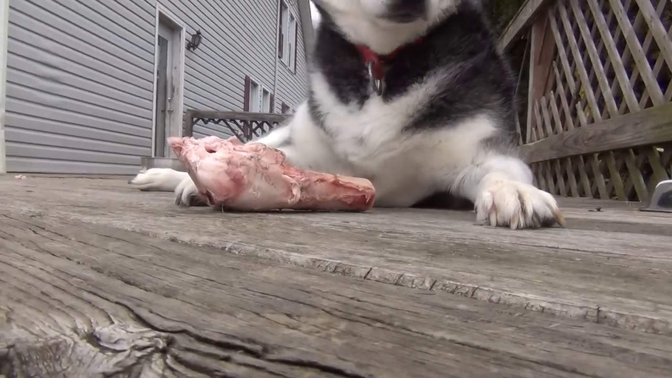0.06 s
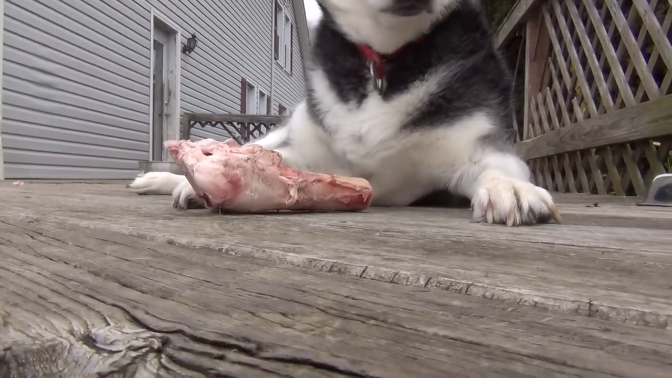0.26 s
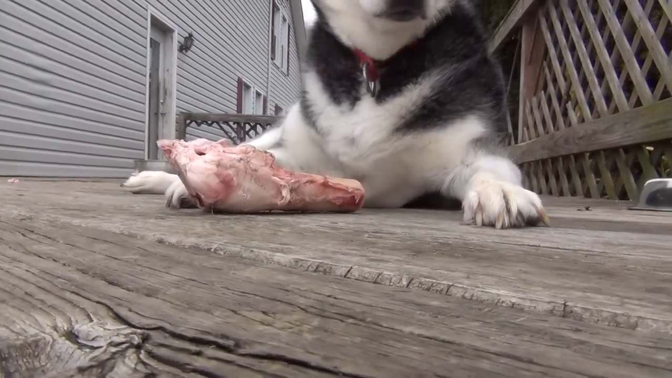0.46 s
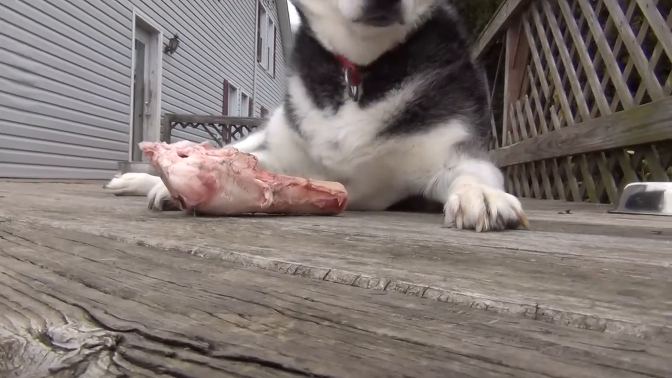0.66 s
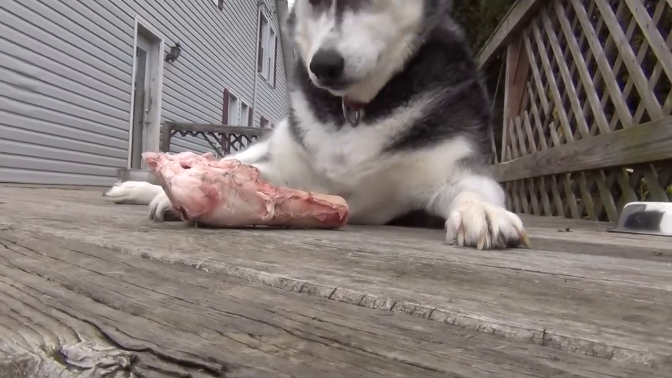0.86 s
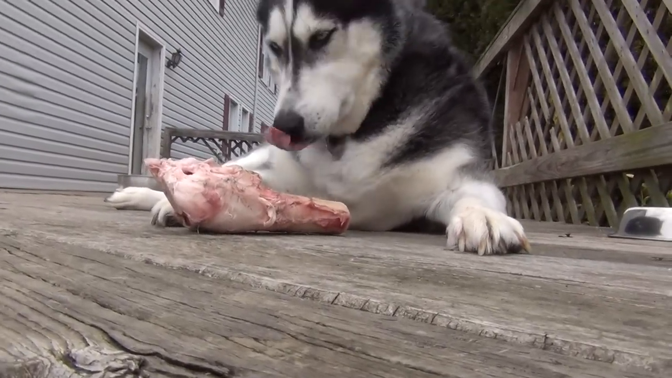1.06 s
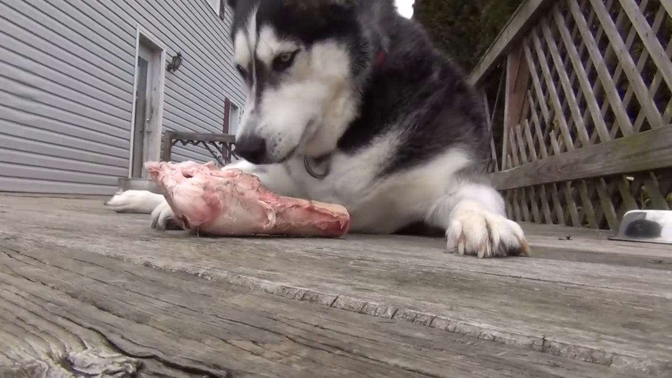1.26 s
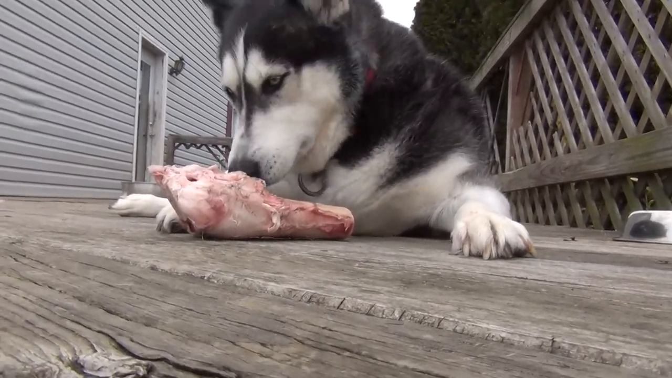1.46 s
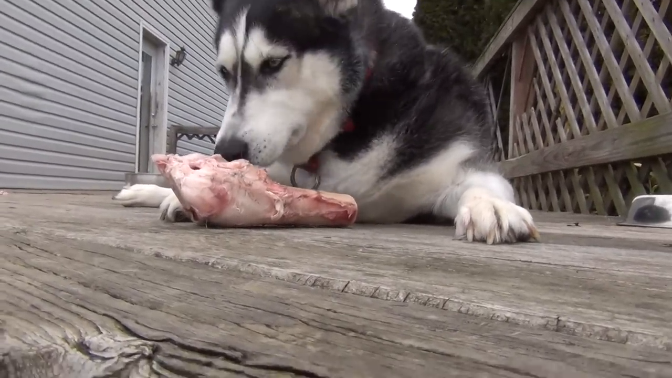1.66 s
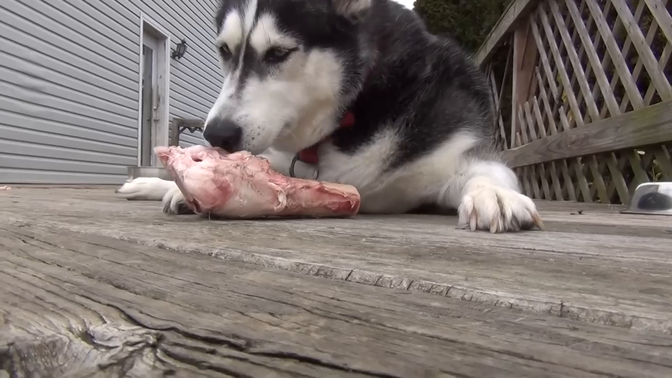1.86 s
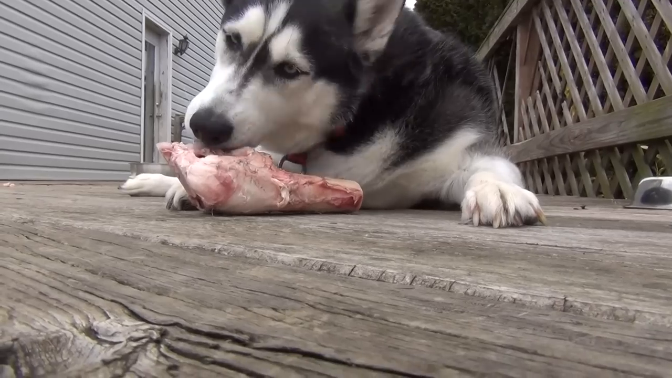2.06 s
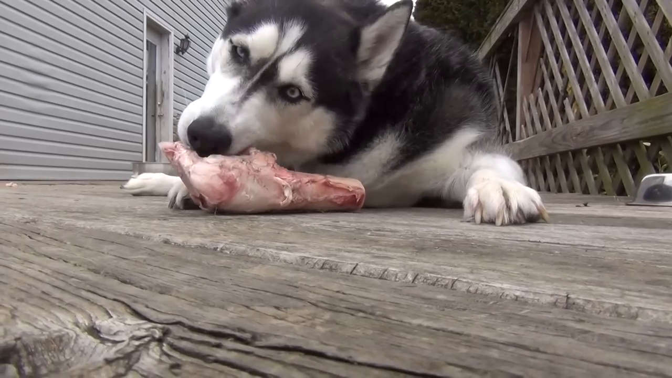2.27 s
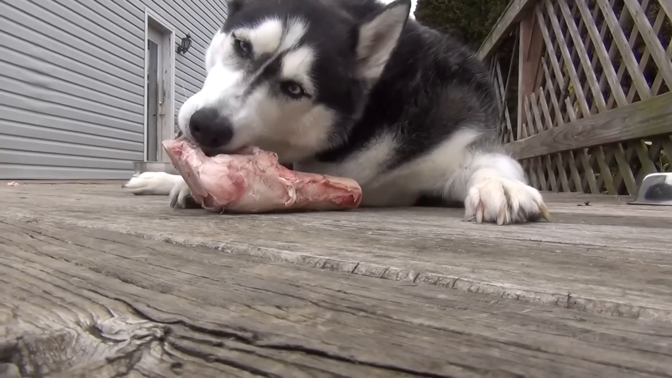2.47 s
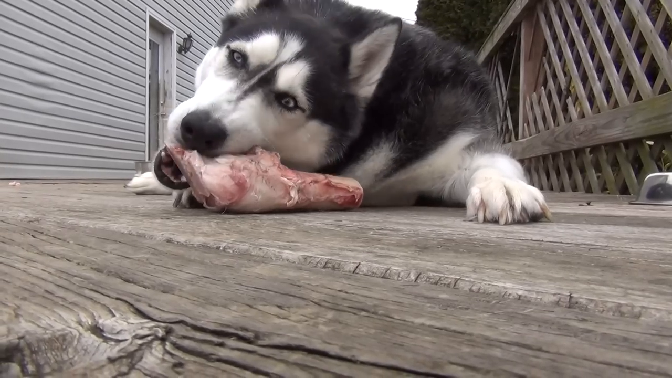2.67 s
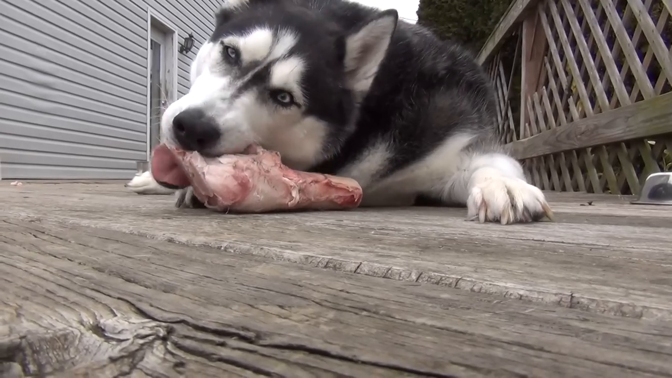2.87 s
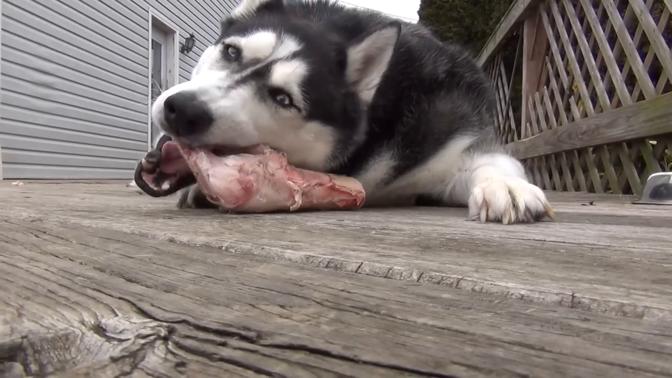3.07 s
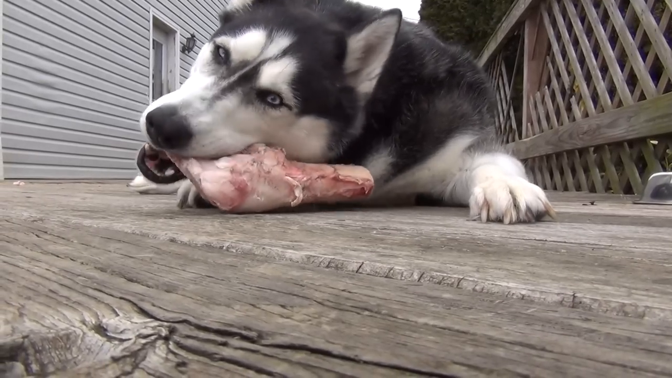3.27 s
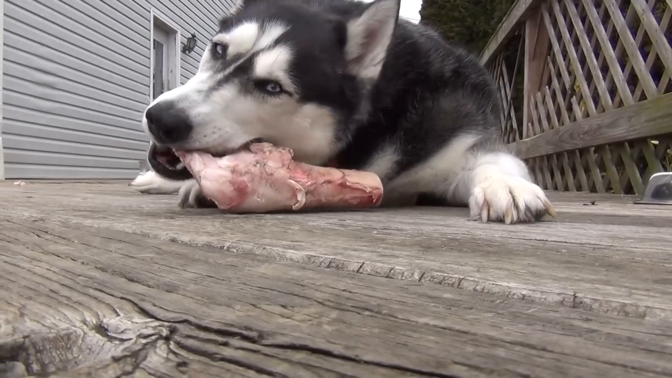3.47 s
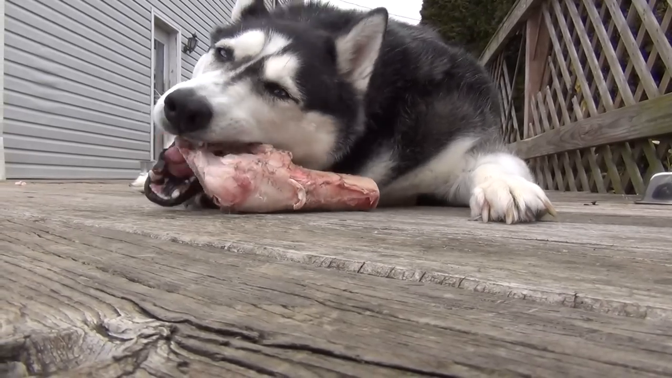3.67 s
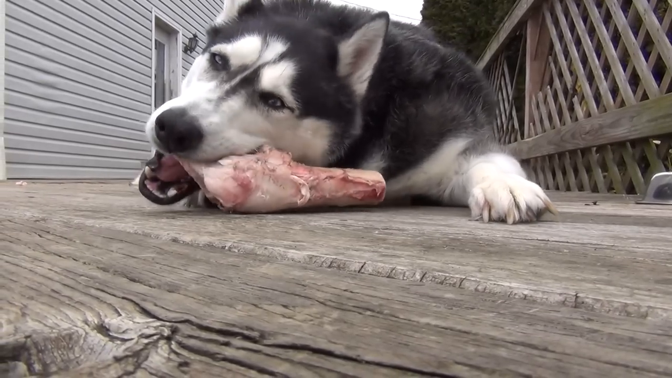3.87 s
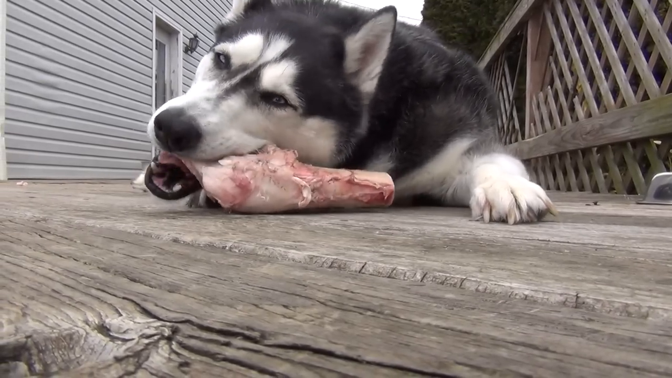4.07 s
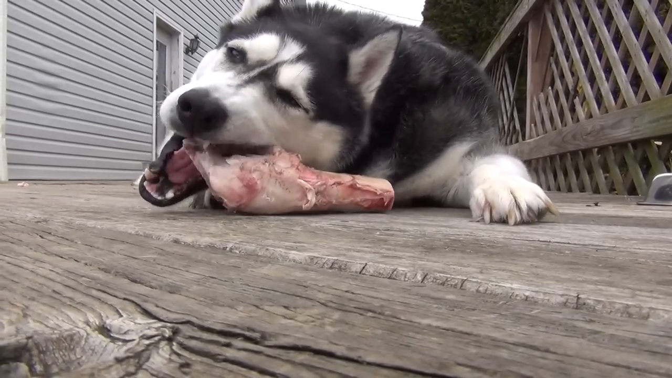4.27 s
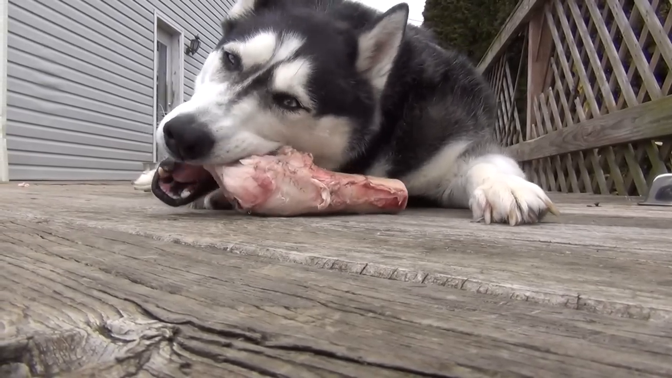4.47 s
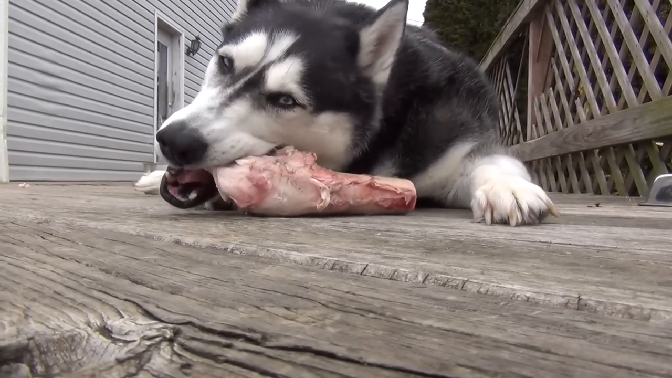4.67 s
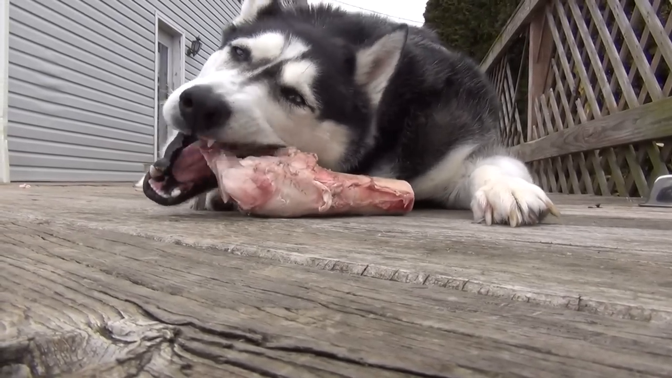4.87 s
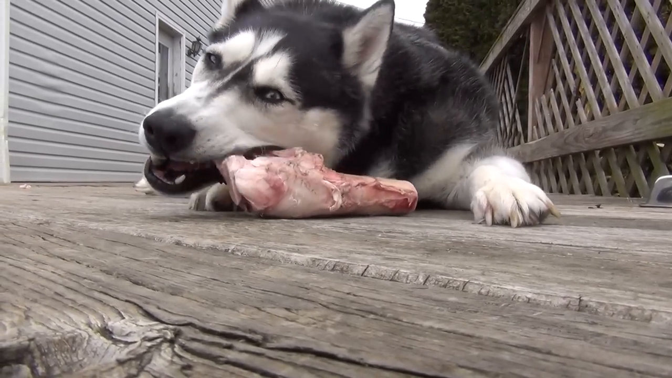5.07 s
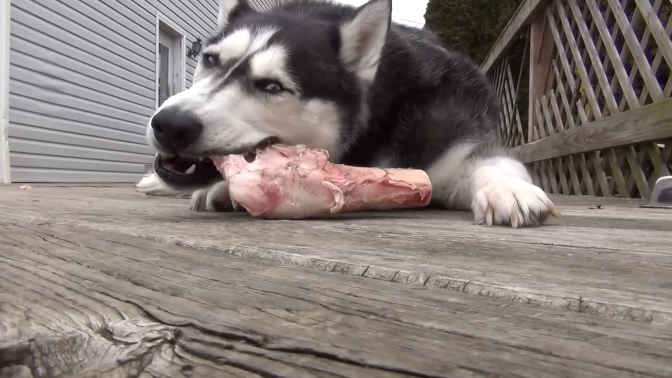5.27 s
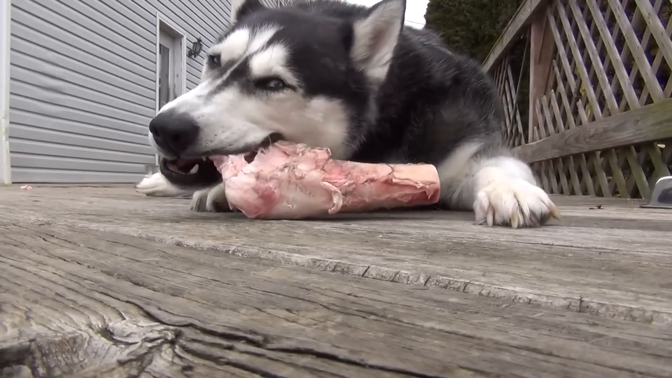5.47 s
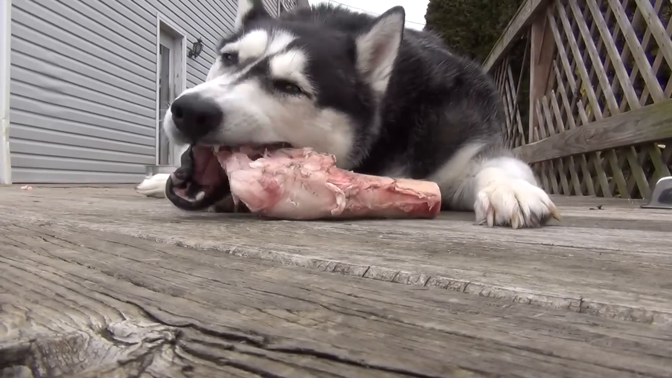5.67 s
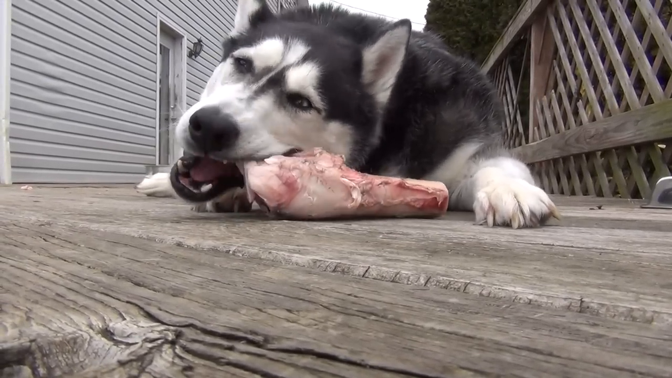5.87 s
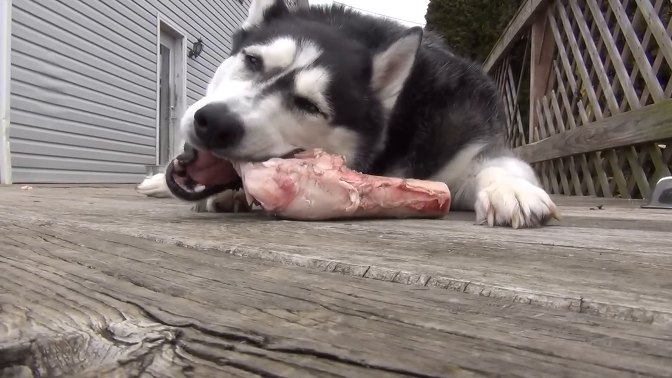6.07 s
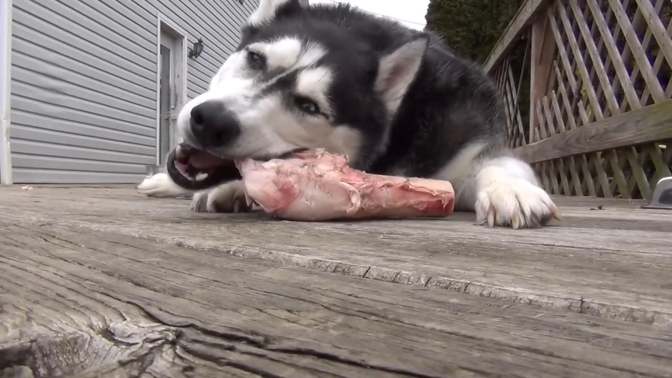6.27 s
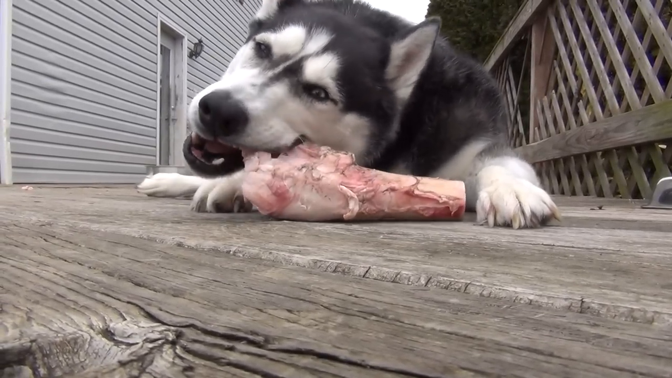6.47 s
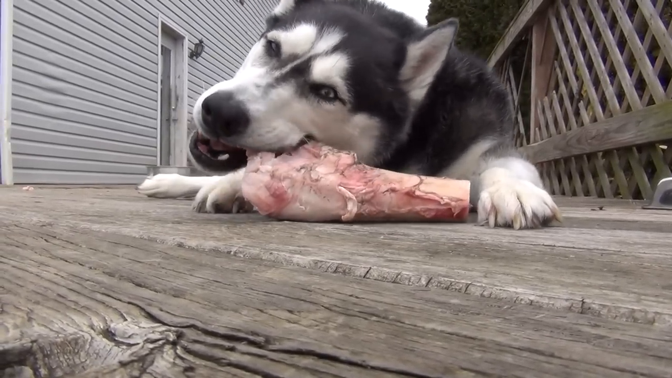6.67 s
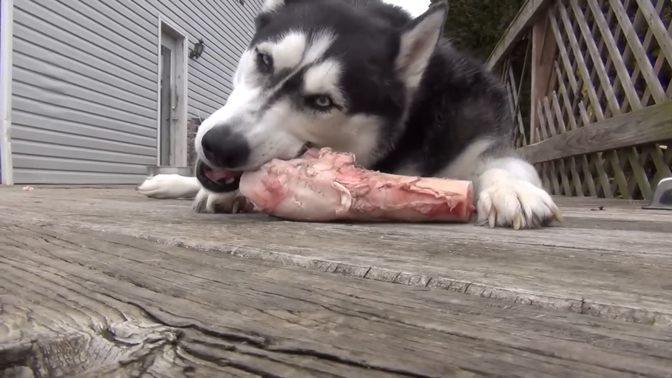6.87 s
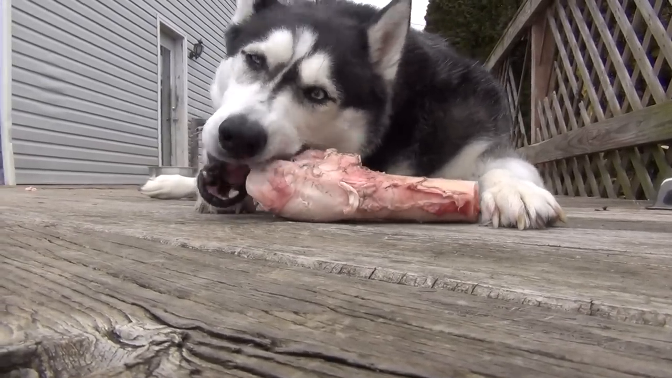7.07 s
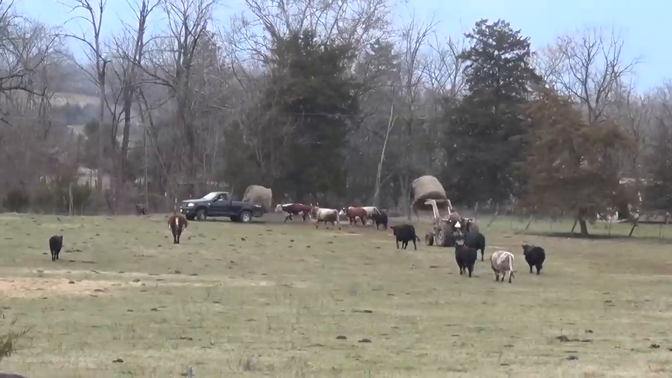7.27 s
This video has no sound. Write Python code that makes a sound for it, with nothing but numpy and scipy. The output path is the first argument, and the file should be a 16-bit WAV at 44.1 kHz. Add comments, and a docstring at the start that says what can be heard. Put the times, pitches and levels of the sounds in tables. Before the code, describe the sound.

A dog gnaws a big raw bone on a wooden deck, teeth cracking in irregular bursts, bone knocking hollowly on the planks, gristle tearing.

```python
"""A dog on a wooden deck gnaws a big raw bone close to a camera lying on the boards.
First claws and teeth crack, fur and tongue rub; from 1 s the bone knocks on the planks, ringing their modes.
A tooth creaks on the bone at 4.0 and 4.6 s by stick-slip, and at 5.2 s gristle tears off in quick slips.
Bright wet ticks are sprinkled in; a shaped-noise rumble and hush with faint crackle lie beneath throughout.
Near 7.17 s the rubbing stops, rumble and hush step up, and the crackle sinks away."""
import sys
import numpy as np
from scipy import signal
from scipy.fft import rfft, irfft
from scipy.io import wavfile
from scipy.ndimage import uniform_filter1d

SR = 44100
rng = np.random.default_rng(int(sys.argv[2]) if len(sys.argv) > 2 else 0)


def log_audio(samples):
    """Write samples as a 16-bit WAV file to the path given in sys.argv[1]."""
    # one column per channel
    frames = np.atleast_2d(samples).T
    # limit to full scale, then quantise
    limited = np.clip(frames, -1, 1)
    pcm = np.round(limited * 32767).astype(np.int16)
    wavfile.write(sys.argv[1], SR, pcm)


N = 322808

# bone dropping on the planks: t/s, peak level/dB, f/Hz around which the struck spot rings best
KNOCKS = [(1.035, -16, 290), (1.247, -13.5, 290), (1.536, -27, 336), (2.353, -12, 108), (2.401, -12, 830),
          (2.451, -4.5, 352), (2.656, -6.5, 720), (2.766, -30, 736), (2.874, -13.5, 270),
          (2.94, -19.5, 528), (3.182, -14, 298), (3.299, -22, 700), (3.433, -10, 560), (3.5, -17.5, 670),
          (3.596, -1.5, 380), (3.863, -14.5, 206), (4.152, -16.5, 910), (4.191, 3.5, 422),
          (4.398, -17.5, 336), (4.963, -18.5, 450), (5.021, -13, 110), (5.456, -17, 524), (5.639, 3, 466),
          (5.897, -9.5, 475), (6.069, -11, 280), (6.248, -1.5, 272), (6.512, -18.5, 148),
          (6.605, -4.5, 236), (6.622, -6, 306), (6.645, -5.5, 282)]
# ringing modes of the planks: f/Hz, level/dB, t60/s
PLANK_MODES = [(116.5, -5, 0.32), (175, -4, 0.24), (267.4, -3, 0.15), (308.4, -1, 0.13), (380, -5.5, 0.078),
               (528.2, 1, 0.09), (724.5, -5, 0.069), (1030, 3, 0.051), (1560, -8, 0.019)]
# lean of the knocks to the left: t/s, left-right level/dB
KNOCK_LEAN = [(5.4, 4), (6.5, 10.5)]

# teeth and claws cracking on something hard: t/s, peak level/dB, peak level of the bright edge/dB
CRACKS = [(0.026, -3.5, -18), (0.048, -17, -16), (0.063, -14, -29), (0.097, -16, -32),
          (0.111, -13.5, -17.5), (0.143, -17, -9.5), (0.188, -8, -13), (0.209, -13, -14), (0.226, -12, -19),
          (0.245, -14.5, -26), (0.266, -17, -21), (0.288, -9.5, -35), (0.383, -9, -13), (0.448, -13.5, -15),
          (0.495, -21, -5.5), (0.653, -12, -37), (0.749, -20.5, -23.5), (0.889, -11, -13),
          (0.921, -17, -26), (0.945, -15, -16), (0.966, -16.5, -28), (0.991, -11.5, -12), (1.011, -22, -28),
          (1.03, -10.5, -10), (1.066, -13.5, -16), (1.076, -15.5, -10), (1.116, -5.5, -15),
          (1.135, -11.5, -31), (1.153, -10, -17), (1.175, -20, -15.5), (1.202, -9.5, -15),
          (1.246, -4.5, -4.5), (1.276, -8, 0.5), (1.308, -14.5, -15), (1.332, -18, -22), (1.905, -7, -17),
          (1.936, -26, -8.5), (2.15, -43, -6.5), (2.198, -20, -15), (2.224, -19, -11), (2.258, -16, -16),
          (2.272, -13, -4), (2.294, -16, -14), (2.352, -9, -12), (2.743, -12, -38), (2.846, -52, -16.5),
          (3.276, -33, -15.5), (3.413, -15, -18), (3.432, -0.5, -32), (3.957, -13, -4.5),
          (4.633, -12.5, -6), (4.652, -10, -30), (5.115, -8, -13), (5.134, -10.5, -4.5), (5.146, -11, -22),
          (5.152, -6.5, -3), (5.165, -26, -3), (5.169, -3.5, -2), (5.355, -26, -0.5), (5.411, -15, -5),
          (5.446, -8.5, -1.5), (5.683, -26, -42), (5.894, -4, -27), (6.28, -14.5, -41), (6.361, -19, -45),
          (6.419, -27, -46), (6.509, -4, -19), (6.627, -14, -20), (6.666, -15, -35), (6.919, -34, -49),
          (6.991, -46, -25)]
# shared pitch of the cracks in one bout: start t/s, f/Hz
CRACK_SPOTS = [(0, 773), (.35, 2010), (1.02, 1270), (1.5, 2140), (2.3, 910), (3.42, 1390), (3.7, 725),
               (4.05, 1370), (4.4, 2930), (4.9, 1830), (5.3, 2320), (5.7, 1260), (6.2, 1480)]
SPOT_SPREAD = 0.05  # share by which a crack strays from the pitch of its spot
# early cracks land on the boards and bring a woody thud, set against the crack's level
CLAWS_UNTIL_S, THUD_DB, THUD_HZ = 1.4, -9.5, 333
# bright ticks of wet tissue and tooth tips: t/s, peak level/dB
TICKS = [(0.6026, -4.5), (1.268, -5), (1.296, -12), (1.55, -15.5), (2.047, -13.5), (2.211, -14),
         (3.096, -12), (3.1226, -18), (3.134, -10.5), (3.7458, -4), (3.8264, -9.5), (3.916, -15.5),
         (4.364, -15.5), (4.996, -6), (5.007, -8.5), (5.385, -16), (5.567, -15), (6.9362, -24)]
TICK_HZ = 7700  # centre, each tick strays a little

# strokes of fur, tongue and teeth: start t/s, length/s, hiss level/dB, extra fizz level/dB, hollow f/Hz
RUB_STROKES = [(0.01, 0.12, -41, 10, 894), (0.137, 0.44, -32, 7, 4000), (0.515, 0.16, -28, 11.5, 1114),
               (0.825, 0.6, -42.5, -9, 4180), (1.02, 0.056, -33, -5, 1320), (2.185, 0.075, -31.5, 5, 2020),
               (2.256, 0.12, -38, 21, 4170), (2.367, 0.087, -33.5, 10.5, 4080),
               (2.719, 0.058, -46.5, 21, 2920), (3.05, 0.23, -73.5, 34.5, 3500),
               (3.205, 0.37, -48.5, 14.5, 1640), (4.362, 0.066, -41, 9, 3460),
               (4.945, 0.11, -38.5, 0, 1600), (5.064, 0.035, -33.5, -13, 1640),
               (5.298, 0.39, -40, -27, 1430), (5.409, 0.021, -19, 6.5, 2540),
               (5.862, 0.043, -33.5, 6, 1490), (6.163, 0.49, -58.5, 23.5, 1460),
               (6.601, 0.071, -35.5, -12, 1500), (6.822, 0.091, -37, -31, 1010), (7, 0.098, -38, 5.5, 1500),
               (7.1, 0.13, -23, 4.5, 760)]
# spectrum of the rubbing hiss: f/Hz, relative level per Hz/dB
RUB_COLOUR = [(180, -8), (300, 0.5), (1550, -0.5), (4500, -5.5), (8100, -17.5), (14000, -26)]
SWELL_POWER, RUBBING_ENDS_S = 1.25, 7.171  # a stroke is a half sine to this power

# gristle tearing, one list a pull: t/s, level/dB, slip rate/Hz
TEAR_PULLS = [
    [(5.184, -17, 215), (5.21, -10.5, 170)],
    [(5.215, -15, 270), (5.252, -12.5, 285)],
    [(5.255, -12.5, 260), (5.277, -13.5, 452), (5.339, -13.5, 160)],
]
# resonances a tearing slip rings: f/Hz, width/Hz, level/dB
BONE_MODES = [(977, 92, 14.5), (1470, 410, 9.5), (1750, 210, 16), (2340, 550, 13), (3500, 850, 8.5),
              (4970, 1350, 6), (6690, 510, 14), (7800, 2100, 3.5)]
# narrow gaps in the tearing ring: f/Hz, width/Hz
BONE_DIPS = [(4350, 370), (5950, 200)]
# tooth creaking along the bone, one list a stroke: t/s, level/dB, slip rate/Hz
CREAK_STROKES = [
    [(3.982, -23.5, 250), (4.005, -23, 350), (4.029, -29, 200)],
    [(4.036, -30.5, 92), (4.063, -28, 112)],
    [(4.612, -28, 100), (4.645, -29.5, 105), (4.699, -32.5, 150)],
]
# resonances a creaking slip rings: f/Hz, width/Hz, level/dB
JAW_MODES = [(720, 120, 12), (1470, 390, 6.5), (1970, 160, 6), (2940, 750, 5.5), (3560, 500, 6),
             (7760, 1800, -1)]

# spectrum of the early echoes: f/Hz, level/dB
WALL_COLOUR = [(500, 0.5), (2000, -7)]
# low rumble, of the boards and, from 7.18 s, a stronger one: t/s, level/dB
RUMBLE = [(0, -42), (1.3, -36), (1.7, -40), (7.17, -39.5), (7.185, -31)]
# spectrum of the rumble: f/Hz, relative level per Hz/dB
RUMBLE_COLOUR = [(30, -37), (60, 0), (110, 4.5), (200, -4), (800, -32)]
# hush of the place and faint chewing: t/s, hush level/dB, crackle level/dB
HUSH = [(0, -34.5, -43), (1.5, -41.5, -50.5), (2.5, -42, -44), (7.17, -43, -54), (7.2, -38.5, -79)]
# spectrum of the hush: f/Hz, relative level per Hz/dB
YARD_COLOUR = [(88, -44), (150, 2), (948, -1), (1370, -5.5), (5990, -21), (14600, -20), (15500, -60)]
# left-right likeness of rumble and hush: f/Hz, correlation (0 to 1)
LIKENESS = [(100, 0.99), (1000, 0.97), (6000, 0.99), (14000, 1)]
# lean of everything but the knocks to the left: f/Hz, left-right level/dB
LEAN = [(60, 10), (600, 0.5), (8000, .5)]

# microphone response: f/Hz, level/dB
MICROPHONE = [(25, -21), (70, 1), (8500, 1.5), (11000, -4.5), (15000, -8.5)]
WHINE_HZ, WHINE_DB = 15734, -65  # thin tone of the camera's electronics, RMS level
EDGE_HZ, CEILING = 16000, 0.93  # top of the band; full scale that rounded peaks approach


def knocks():
    """Each blow, a short rattle of contacts, rings the plank modes near its pitch; neighbours beat with them."""
    out, t = np.zeros((2, N)), np.arange(SR // 4) / SR
    hz, mode_db, t60 = np.transpose(PLANK_MODES)[:, :, None]
    spots = rng.standard_normal((len(KNOCKS), 3, len(PLANK_MODES), 1))
    chatter = rng.standard_normal((len(KNOCKS), 40))
    rattle_t = t[:SR // 20:56]  # a possible contact every 56 samples
    for (s, db, pitch_hz), spot, jolt in zip(KNOCKS, spots, chatter):
        octaves = np.log2(hz / pitch_hz)
        favour_db = 4 * np.exp(-(octaves / 0.25) ** 2) - 4.0 * octaves ** 2
        level = gain_of(mode_db + favour_db + 1.5 * spot[0] - 60 * t / t60)
        turn = 2 * np.pi * hz * (1 + 0.015 * spot[1]) * t
        neighbour = 0.55 * np.sin(turn * (1 + 0.12 * spot[2]))
        onset = np.minimum(t / 0.0017, 1)
        modes = level * (np.sin(turn) + neighbour) * onset
        side_db = np.interp(s, *np.transpose(KNOCK_LEAN)) * np.minimum(300 / hz, 1)  # the bass leans most
        ring = [(gain_of(sign * side_db / 2) * modes).sum(0) for sign in (1, -1)]
        contacts = np.zeros((1, SR // 20))
        contacts[0, ::56] = 0.17 * jolt * np.exp(-(rattle_t / 0.018) ** 2)
        contacts[0, 0] = 1
        sound = signal.oaconvolve(ring, contacts, axes=1)
        add(out, s, gain_of(db) * sound / abs(sound.mean(0)).max())
    return signal.sosfilt(signal.butter(2, 90, "high", fs=SR, output="sos"), out)


def cracks():
    """A hard contact snaps at the pitch of its spot, with a bright edge; early ones also thud in the wood."""
    out, (since, spot_hz) = np.zeros(N), np.transpose(CRACK_SPOTS)
    for (s, db, edge_db), noise in zip(CRACKS, rng.standard_normal((len(CRACKS), 4, 2000))):
        hz = spot_hz[since <= s][-1] * (1 + SPOT_SPREAD * noise[2, 0])
        sound = snap(db, hz, 0.026, noise[0], sharpness=2.6, kick=4.5)
        if s < CLAWS_UNTIL_S:
            sound = sound + snap(db + THUD_DB, THUD_HZ, 0.032, noise[3], sharpness=0.95, kick=3.4)
        edge = snap(edge_db, 4120, 0.024, noise[1], sharpness=1.0, kick=4.35)
        add(out, s, sound + edge)
    return out


def ticks():
    """Wet tissue and tooth tips give tiny snaps with a high, narrower resonance."""
    out = np.zeros(N)
    for (s, db), noise in zip(TICKS, rng.standard_normal((len(TICKS), 1001))):
        hz = TICK_HZ * (1 + 0.024 * noise[0])
        add(out, s, snap(db, hz, 0.012, noise[1:], sharpness=4.7, kick=3.7))
    return out


def snap(db, hz, t60, noise, sharpness, kick):
    """A sharp kick and a dying burst of noise, through a broad resonance with steep flanks."""
    t = np.arange(len(noise)) / SR
    burst = noise * gain_of(-60 * t / t60) * np.minimum(t / 0.00038, 1)
    burst[20] += kick
    sound = resonate(resonate(burst, hz, hz / sharpness), hz, hz / 0.48)
    return gain_of(db) * sound / abs(sound).max()


def tearing():
    """Gristle tears off in fast stick-slip that rings the bone, with narrow gaps in the ring."""
    tear = sum(slipping(pull, BONE_MODES, uneven_db=1.52, kick=3.5, flank=5.1, sign=-0.97)
               for pull in TEAR_PULLS)
    for hz, width_hz in BONE_DIPS:
        tear = tear - resonate(tear, hz, width_hz)
    return tear


def creaks():
    """A tooth sticks and slips along the bone, more evenly than a tear."""
    return sum(slipping(stroke, JAW_MODES, uneven_db=0.3, kick=4.5, flank=1.9, sign=0.94)
               for stroke in CREAK_STROKES)


def slipping(rows, modes, uneven_db, kick, flank, sign):
    """Stick-slip: each slip, a kick and a brief puff, rings the modes; a negative sign fills their valleys."""
    a, b = round(rows[0][0] * SR), round(rows[-1][0] * SR)
    db, per_s = (c[a:b] for c in follow(rows))
    drift, size, air = rng.standard_normal((3, N))[:, a:b]
    pace = per_s * gain_of(uneven_db * evened(uniform_filter1d(drift, size=300)))
    # a slip falls wherever the running count passes a whole number
    slips = np.diff(np.floor(np.cumsum(pace) / SR + 0.81), prepend=0) * gain_of(uneven_db * size)
    puffs = signal.lfilter([1], [1, -0.97], slips) * air + kick * slips
    ring = 0
    for k, (hz, width_hz, mode_db) in enumerate(modes):
        mode = resonate(resonate(puffs, hz, width_hz), hz, flank * width_hz)
        ring = ring + sign ** k * gain_of(mode_db) * mode
    out = np.zeros(N)
    out[a:b] = gain_of(db) * evened(ring) * signal.windows.tukey(b - a, 0.05)
    return out


def rubbing():
    """Hiss roughened by grains swells once a stroke and rings in a small hollow; wet strokes fizz high up."""
    grit = 0.65 + 0.4 * evened(signal.lfilter([1], [1, -0.98], abs(grains(500, 2.5))))
    hiss = evened(coloured(grit * rng.standard_normal(N), lambda hz: read(RUB_COLOUR, hz)))
    fizz = 0.29 * evened(resonate(resonate(hiss, 8130, 2400), 7600, 5600))
    out, t = np.zeros(N), np.arange(N) / SR
    for start, length, db, wet_db, hollow_hz in RUB_STROKES:
        part = slice(round(start * SR), round((start + length) * SR))
        swell = abs(np.sin(np.pi * (t[part] - start) / length)) ** SWELL_POWER
        hollow = 30 / np.sqrt(hollow_hz) * evened(resonate(hiss[part], hollow_hz, hollow_hz / 12))
        out[part] += gain_of(db) * swell * (hiss[part] + hollow + gain_of(wet_db) * fizz[part])
    return out * (t < RUBBING_ENDS_S)


def crackle():
    """Faint random ticks of the wet meat, in three sizes, coming in clumps."""
    drift = uniform_filter1d(uniform_filter1d(rng.standard_normal(N), size=2500), size=2500)
    clumps = gain_of(7.5 * evened(drift))
    out = np.zeros(N)
    for hz, share in [(1800, 0.3), (3800, 0.29), (7800, 0.31)]:
        out += share * resonate(resonate(grains(40 * clumps, 4.5), hz, hz / 3), hz, hz / 2.5)
    return evened(out)


def walls(x):
    """Dense early echoes from house wall and railing, different on each side, die away quickly."""
    taps = np.zeros((2, 1400))
    at = np.arange(100, 1380, 20) + rng.integers(0, 20, (2, 64))
    fade = gain_of(-60 * at / SR / 0.081)
    np.put_along_axis(taps, at, rng.choice([-1., 1.], at.shape) * fade, 1)
    echoes = signal.oaconvolve(x[None], taps / np.linalg.norm(taps[0]), axes=1)[:, :N]
    return coloured(echoes, lambda hz: read(WALL_COLOUR, hz))


def low_rumble():
    """Low shaped noise: the boards rumbling under weight, and from 7.18 s a stronger low rumble."""
    return gain_of(follow(RUMBLE)[0]) * steady(RUMBLE_COLOUR, patchy_db=-0.5)


def yard_hush():
    """The open air is a wide, softly drifting noise."""
    return gain_of(follow(HUSH)[0]) * steady(YARD_COLOUR, patchy_db=0.9)


def steady(colour, patchy_db):
    """Two-channel noise, built from random spectra with patches drifting over time and frequency."""
    frames, hz = N // 256 + 5, np.fft.rfftfreq(1024, 1 / SR)
    a, b, c, d, patches = rng.standard_normal((frames, 513, 5)).T
    patches = evened(uniform_filter1d(uniform_filter1d(patches, size=12, axis=0), size=10, axis=1))
    same = np.clip(read(LIKENESS, hz), -1, 1)[:, None]
    left = a + 1j * b
    right = same * left + np.sqrt(1 - same ** 2) * (c + 1j * d)
    z = np.array([left, right]) * gain_of(read(colour, hz)[:, None] + patchy_db * patches)
    return evened(signal.istft(z, nperseg=1024, noverlap=768)[1][:, :N])


def grains(per_s, spread_db):
    """Sparse clicks of random sign; a few are much larger."""
    when, size, sign = rng.random((3, N))
    return (when < per_s / SR) * gain_of(-spread_db * np.log(size + 0.0078)) * np.sign(sign - 0.5)


def resonate(x, hz, width_hz):
    """A decaying complex oscillator: a resonance of about unit gain at its centre."""
    r = np.exp(-np.pi * width_hz / SR)
    return 2 * signal.lfilter([1 - r], [1, -r * np.exp(2j * np.pi * hz / SR)], x).real


def coloured(x, db):
    """Shapes the spectrum of x by a function that gives dB for Hz."""
    size = x.shape[-1]
    return irfft(rfft(x) * gain_of(db(np.fft.rfftfreq(size, 1 / SR))), size)


def gain_of(db):
    """Amplitude factor for a level in dB."""
    return 10 ** (np.asarray(db) / 20)


def evened(x):
    """Brings x to an RMS of 1."""
    return x / np.sqrt(np.mean(x ** 2) + 1e-20)


def read(points, hz):
    """Reads a spectrum table along a log-frequency axis."""
    f, value = np.transpose(points)
    return np.interp(np.log(hz + 1), np.log(f + 1), value)


def follow(rows):
    """Columns of a curve table, one value a sample."""
    s, *columns = np.transpose(rows)
    return [np.interp(np.arange(N) / SR, s, c) for c in columns]


def add(mix, s, sound):
    """Lays a sound into the mix at s seconds, cut off at the end."""
    part = mix[..., round(s * SR):][..., :sound.shape[-1]]
    part += sound[..., :part.shape[-1]]


def scene():
    """Gnawing with its echoes, rumble and hush lean left in the bass; the knocks carry their own lean."""
    chewing = gain_of(follow(HUSH)[1]) * crackle()
    near = cracks() + ticks() + tearing() + creaks() + rubbing() + chewing
    air = near + gain_of(-8.0) * walls(near) + low_rumble() + yard_hush()
    leaning = [coloured(side, lambda hz: sign * read(LEAN, hz) / 2) for side, sign in zip(air, (1, -1))]
    return knocks() + leaning


def record(dry):
    """The microphone drops the extremes; the camera rounds off peaks, adds its thin tone and limits the band."""
    heard = coloured(dry, lambda hz: read(MICROPHONE, hz))
    whine = gain_of(WHINE_DB) * np.sqrt(2) * np.sin(2 * np.pi * WHINE_HZ * np.arange(N) / SR)
    rounded = CEILING * heard / (1 + heard ** 4) ** (1 / 4)
    band = signal.firwin(511, EDGE_HZ, window=("kaiser", 9), fs=SR)
    return signal.oaconvolve(rounded + whine, band[None], "same")


dry = scene()
out = record(dry)
log_audio(out)
```